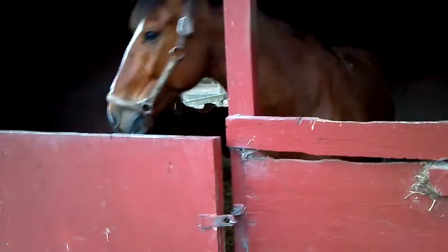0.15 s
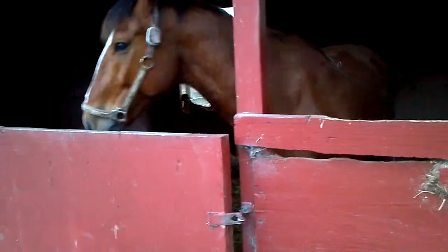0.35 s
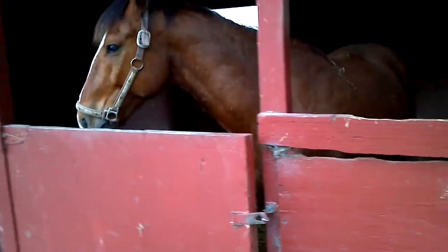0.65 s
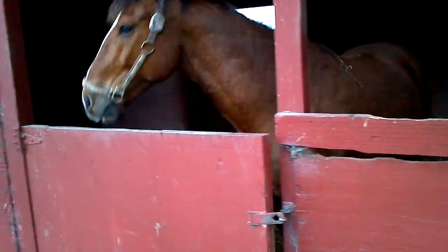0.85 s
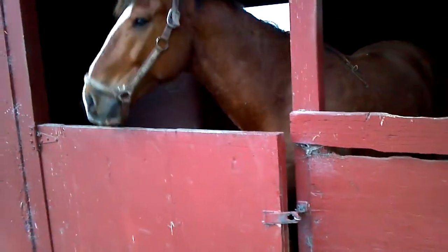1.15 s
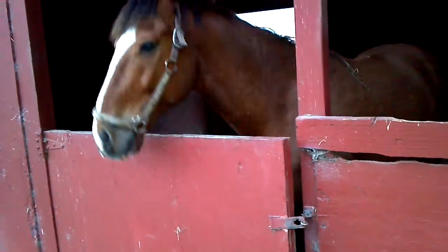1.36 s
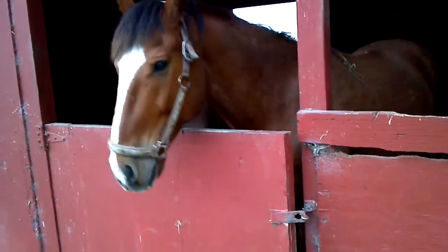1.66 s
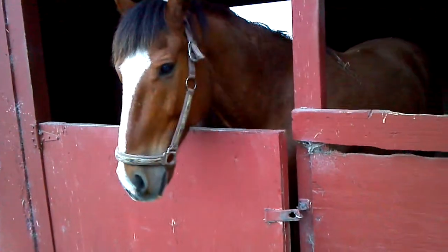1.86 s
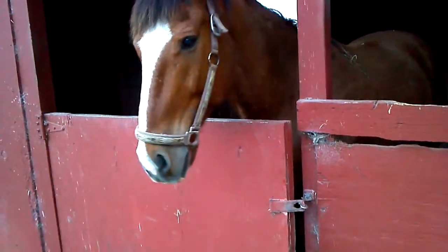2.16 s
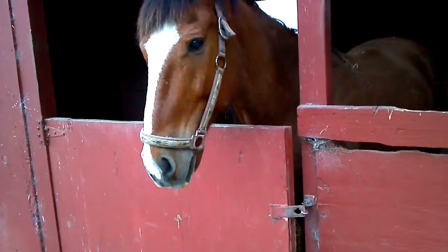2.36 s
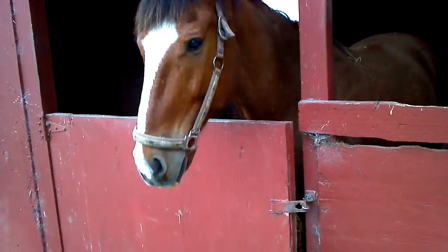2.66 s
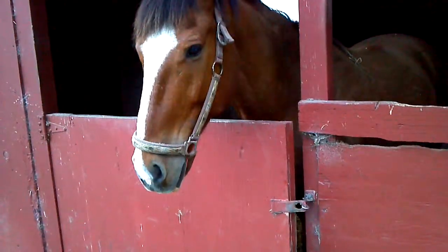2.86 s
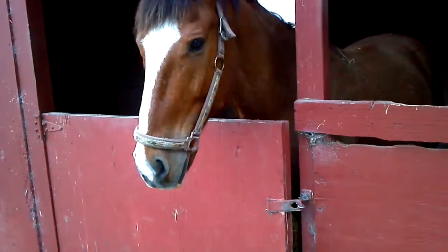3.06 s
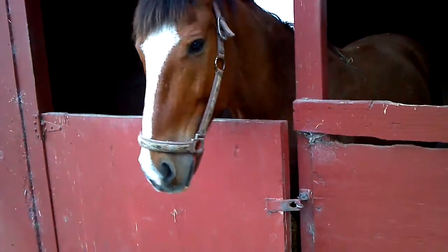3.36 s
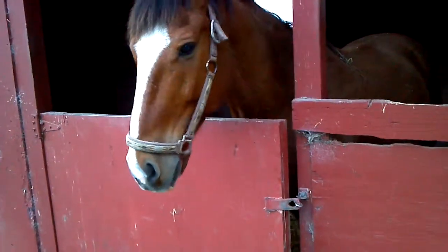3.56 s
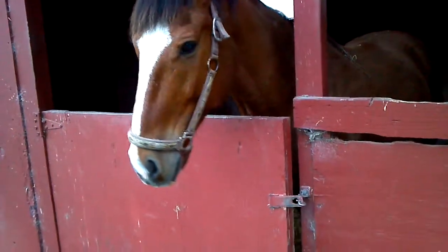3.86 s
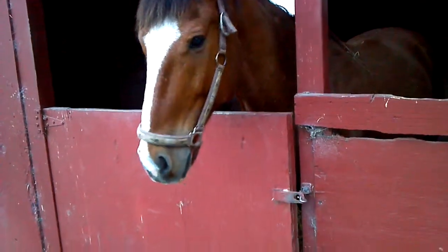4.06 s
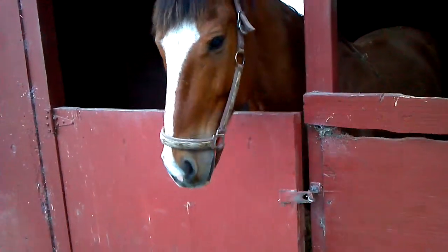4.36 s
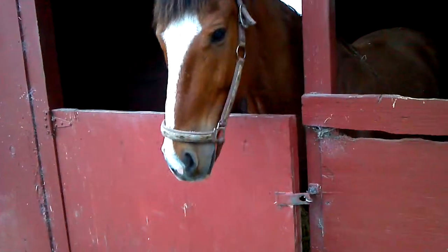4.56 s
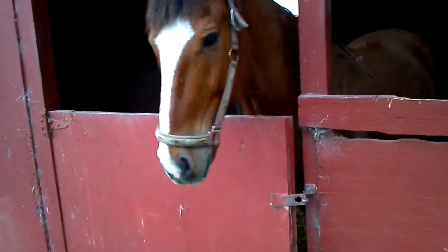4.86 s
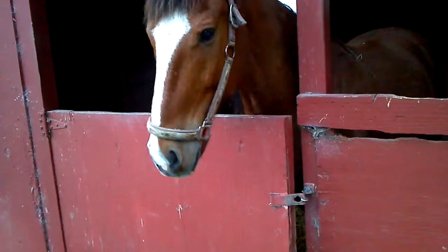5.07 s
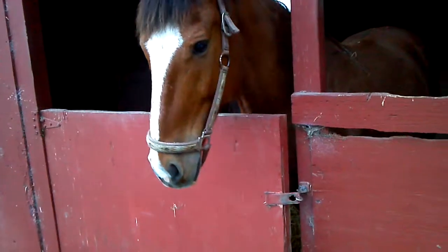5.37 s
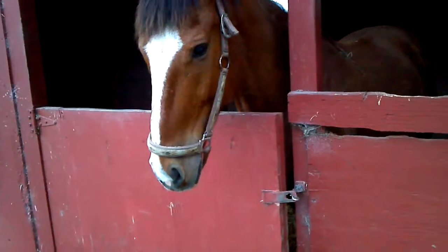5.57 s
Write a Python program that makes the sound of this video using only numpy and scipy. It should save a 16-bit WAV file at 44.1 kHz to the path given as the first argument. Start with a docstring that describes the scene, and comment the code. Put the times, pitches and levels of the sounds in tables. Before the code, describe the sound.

Faint birds chirp over a steady outdoor rush, then a horse bumps its wooden stall door and the metal latch rattles.

```python
"""Hoof against a stall door

A horse knocks a hoof against its plank stall door; the loose iron latch clacks and jingles.
A far steady roar fills the yard, a dry hiss swells, small birds call. Two microphone ports are
delayed and subtracted into left and right; gain control ducks after the blows."""
import sys
import numpy as np
from scipy import signal
from scipy.fft import rfft, irfft
from scipy.io import wavfile
from scipy.ndimage import uniform_filter1d

SR = 44100
rng = np.random.default_rng(int(sys.argv[2]) if len(sys.argv) > 2 else 0)


def unload_audio(sound):
    """Save the sound as a 16-bit wav file, at the path given as the first command line argument."""
    columns = np.transpose(np.atleast_2d(sound))
    # keep every value between -1 and 1, then stretch to whole-number steps
    steps = np.round(np.clip(columns, -1, 1) * 32767)
    wavfile.write(sys.argv[1], SR, steps.astype(np.int16))


N = 251811


def amp(db):
    return 10 ** (np.asarray(db) / 20)


def rms_one(x):
    return x / np.sqrt(np.mean(x ** 2) + 1e-20)


def at_hz(points, hz, column=1):
    return np.interp(np.log(hz), np.log(np.array(points)[:, 0]), np.array(points)[:, column])


def butter(x, order, hz, kind):
    return signal.sosfilt(signal.butter(order, hz, kind, fs=SR, output="sos"), x)


def nearness(hz, spot_hz, octaves):
    return np.exp(-(np.log2(hz / spot_hz) / octaves) ** 2)


def drift(rate_hz):
    """Smooth random wander with a spread of 1."""
    r = np.exp(-2 * np.pi * rate_hz * 40 / SR)   # one step every 40 samples
    slow = signal.lfilter([1], [1, -2 * r, r * r], rng.standard_normal(N // 40 + 2002))[2000:]
    return np.interp(np.arange(N) / 40, np.arange(len(slow)), rms_one(slow))


def ring(clicks, hz, t60):
    """A unit click sets a sine of height 1 ringing."""
    r, w = amp(-60 / (t60 * SR)), 2 * np.pi * hz / SR
    return signal.lfilter([0, np.sin(w)], [1, -2 * r * np.cos(w), r * r], clicks + 1e-18)


def resonance(x, hz, width_hz):
    r, w = np.exp(-np.pi * width_hz / SR), 2 * np.pi * hz / SR
    return signal.lfilter(np.array([1, 0, -1]) * (1 - r * r) / 2, [1, -2 * r * np.cos(w), r * r], x)


def spikes(times, db):
    out = np.zeros(N)
    np.add.at(out, np.round(np.asarray(times) * SR).astype(int), amp(db))
    return out


# Tone of the roar: freq_hz, relative_density_db
ROAR_SPECTRUM = [(30, 7), (80, -9), (180, -13), (242, -7), (388, -8.5), (600, -6), (904, -2), (1300, -9.5),
                 (1750, -12), (2500, -15.5), (4070, -24.5), (6900, -29.5), (12300, -29.5), (14000, -39),
                 (16000, -46)]
# How alike the roar is at the two ports: freq_hz, correlation
ROAR_LIKENESS = [(60, 0.78), (250, 0.95), (700, 0.71), (2000, 0.1)]

def far_roar(level_db=-47.5):
    """A steady bed of third-octave noise bands, partly alike at the two ports."""
    out, edges = 0, 28 * 2 ** np.arange(0, 9.4, 1 / 3)
    white = rng.standard_normal((2, 2, N))
    for k, (low, high) in enumerate(zip(edges, edges[1:])):
        common, own = butter(white[k % 2], 2, [low, high], "band")
        hz = np.sqrt(low * high)
        alike = at_hz(ROAR_LIKENESS, hz)
        second = alike * common + np.sqrt(1 - alike ** 2) * own
        out = out + amp(at_hz(ROAR_SPECTRUM, hz) + .26 * drift(4.6)) * np.array([common, second])
    return amp(level_db) * rms_one(out)


# Swells of hiss: centre_s, level_db
HISS_SWELLS = [(0, -53), (.55, -58), (.74, -51), (2.27, -60), (2.6, -61), (3.1, -60.5), (3.74, -44.5),
               (4.25, -61), (4.41, -57.5), (4.951, -41.5), (5.22, -54)]

def dry_hiss(half_width_s=.058):
    """Soft swells of fine dry hiss: faint rustling, and the latch's rattle after the blows."""
    t = np.arange(N) / SR
    swell = sum(amp(db) * np.exp(-((t - s) / half_width_s) ** 2 / 2) for s, db in HISS_SWELLS)
    return swell * rms_one(butter(rng.standard_normal(N), 2, [3900, 14500], "band"))


# One bird repeats a falling whistle: start_s, end_hz, level_db
BIRD_WHISTLES = [(-.08, 4410, -53.5), (0.085, 4390, -51.5), (0.253, 4380, -51.5), (0.424, 4360, -53),
                 (0.607, 4440, -53), (0.808, 4390, -53.5), (.97, 4450, -63)]
# Another answers with thin rising chips: start_s
CHIP_STARTS = [.03, .205, .365, .54]
# Shape of each chip: length_s, start_hz, end_hz, level_db
CHIP_SHAPE = (.045, 7200, 8350, -60)
# Single calls: start_s, length_s, start_hz, end_hz, level_db, buzz_rad
BIRD_CALLS = [(0.965, 0.04, 3830, 3170, -51, 0.1), (1.079, 0.29, 6150, 5930, -51.5, 0.6),
              (1.098, .022, 2320, 2280, -46, 0), (1.88, 0.15, 7100, 6900, -66, 0.13)]

def birds(whistle_s=.155, whistle_drop_hz=120, buzz_hz=274, echo_t60_s=.4):
    """Near sines that glide fast, then settle; far away they flutter and trail a soft echo."""
    out, t = np.zeros(N), np.arange(N) / SR
    flutter_db, wobble_hz = 3 * drift(60), 18 * drift(90)
    whistles = [(s, whistle_s, hz + whistle_drop_hz, hz, db, 0) for s, hz, db in BIRD_WHISTLES]
    chips = [(s, *CHIP_SHAPE, 0) for s in CHIP_STARTS]
    for s, length, start_hz, end_hz, db, buzz in whistles + chips + BIRD_CALLS:
        progress = (t - s) / length
        on = (progress > 0) & (progress < 1)
        hz = end_hz + (start_hz - end_hz) * (1 - progress[on]) ** 3 + wobble_hz[on] * (1 + 2 * buzz)
        envelope = np.sin(np.pi * progress[on] ** .5) ** .7 * amp(db + flutter_db[on])
        throat = 2 * np.pi * buzz_hz * t[on]   # its flutter swings loudness and pitch together
        tone = np.sin(2 * np.pi * np.cumsum(hz) / SR + buzz * np.sin(throat))
        out[on] += envelope * (1 + buzz * np.cos(throat)) * tone
    echo = amp(-36 - 60 * t[:SR // 3] / echo_t60_s) * rng.standard_normal(SR // 3)
    return out + signal.fftconvolve(out, echo)[:N]


# Latch hits, levels relative: start_s, clack_db, jingle_db, rise_ms, favoured_mode_hz
LATCH_HITS = [(1.0433, -44.5, -61, 2.2, 6900), (2.5666, -45, -52, 5.9, 6900),
              (3.6306, -15.5, -32, 1.15, 6900), (3.6378, -19, -25, 1.26, 6900),
              (3.659, -29, -41, 1.5, 6900), (3.691, -31, -40, 2.3, 6900), (3.698, -33.5, -49, 1.3, 6900),
              (3.7986, -35, -42.5, 7.9, 10300), (3.8403, -24.5, -30.5, 0.47, 14900),
              (4.19, -47.5, -59, 1.03, 3730), (4.4372, -14.5, -29, 2.1, 10300),
              (4.4451, -9, -12.5, 0.55, 12700), (4.448, -13, -39, 2.23, 3710), (4.5414, -25, -36, 1, 4000),
              (4.5475, -26.5, -35.5, 3.2, 11600), (4.59, -42, -48, 10.4, 10300),
              (4.627, -46, -41.5, 2.4, 14900), (4.7211, -41.5, -53, 1.15, 6900),
              (4.841, -25, -30, 3.3, 11600), (4.85, -16.5, -25, 4.5, 3665),
              (5.0132, -32.5, -39.5, 2.3, 10300), (5.021, -32.5, -50, 4.2, 3800),
              (5.0458, -17, -25, 1.47, 3930), (5.064, -25.5, -42, 1.03, 6900),
              (5.1442, -29, -40.5, 6, 9000), (5.1636, -26, -32.5, 2.3, 9600),
              (5.1745, -27, -38.5, 4.4, 12700), (5.545, -36.5, -36.5, 2.2, 11600),
              (5.6068, -39.5, -40, 4.8, 9030)]
# Hollow tone of the bolt in its keeper: centre_hz, width_hz, relative_db
CLACK_RESONANCES = [(984, 1380, 1), (1890, 1330, 5), (3450, 1360, 8.5), (5490, 6300, -2.5)]
# Ring of the latch, the bolt lowest: pitch_hz, relative_db, t60_s
IRON_MODES = [(3720, -9, 0.035), (6900, -12, 0.021), (9000, -5, 0.055), (9600, -28, 0.3), (10300, -18, .05),
              (11600, -6, 0.045), (12700, -16, 0.07), (14900, -7, 0.065)]

def latch_rattle():
    """Each hit is a short chatter of iron on iron: a hollow clack and a bright jingle."""
    clack, jingle = np.zeros((2, N))
    for s, clack_db, jingle_db, rise_ms, _ in LATCH_HITS:
        start = round(s * SR)
        t = np.arange(min(SR // 4, N - start)) / SR
        rise = 1000 * t / rise_ms
        shed_echo = amp(-19 - 60 * t / .17) * np.minimum(rise, 1)
        envelope = rise * np.exp(1 - rise) + shed_echo
        clack[start:start + len(t)] += amp(clack_db) * envelope
        jingle[start:start + len(t)] += amp(jingle_db) * envelope
    chatter = rng.standard_normal((2, N)) * amp(1.5 * drift(300))
    hollow = sum((-1) ** k * amp(db) * resonance(chatter[0], hz, width)
                 for k, (hz, width, db) in enumerate(CLACK_RESONANCES))
    bright = butter(chatter[1], 2, [8130, 14200], "band")
    return amp(-3.5) * clack * rms_one(hollow) + amp(4.5) * jingle * rms_one(bright)


def latch_ring(favour_db=12):
    """The same hits set the iron ringing; light, bright touches bring out the upper modes."""
    s, clack_db, jingle_db, rise_ms, spot_hz = np.transpose(LATCH_HITS)
    upper_db = -19 + .43 * jingle_db + .92 * (jingle_db - clack_db)
    chance_db = 3 * rng.standard_normal((len(s), len(IRON_MODES)))
    out = 0
    for k, (hz, db, t60) in enumerate(IRON_MODES):
        drive_db = upper_db if k else clack_db   # the bolt follows the clack
        spot_db = favour_db * nearness(hz, spot_hz, .07) + chance_db[:, k]
        out = out + ring(spikes(s + rise_ms / 1000, db + drive_db + spot_db), hz, t60)
    return out


# Hoof and door blows on the planks: start_s, peak_db, contact_ms, favoured_mode_hz
BLOWS = [(3.631, 2.5, 0.16, 359), (3.691, -10.5, 0.75, 700), (4.445, -22.5, 0.2, 330),
         (4.72, -12.5, 0.72, 238), (4.853, -23, 0.33, 506), (4.895, -8, 0.41, 290), (5.016, -11, 0.6, 630),
         (5.03, -14, 0.92, 323), (5.18, -25, 0.16, 770)]
# Woody body of the door: pitch_hz, relative_db, uncapped_t60_s
PLANK_MODES = [(120.7, -9, 0.41), (162.5, -2, 0.26), (235.7, 5.5, 0.16), (333, 3.5, 0.17), (345, -13, 0.24),
               (422, -13, 0.4), (491.7, -0.5, 0.4), (611.5, -6, 0.23), (677, -4, 0.39), (729, 4, 0.084),
               (772.5, -1.5, 0.18), (953, 4.5, 0.015), (1220, 1, 0.026), (1576, 1, 0.04), (1760, 5, 0.026),
               (916, 16.5, 0.009), (1870, 12.5, 0.024)]

def door_knocks(favour_db=7.6, max_t60_s=.22):
    """Each blow rings the nailed planks briefly; the spot struck colours the knock."""
    out = np.zeros(N)
    for s, peak_db, contact_ms, spot_hz in BLOWS:
        start = round(s * SR)
        click = spikes([0], 0)[:min(SR // 2, N - start)]
        body = sum(amp(db + favour_db * nearness(hz, spot_hz, .11)) * ring(click, hz, min(t60, max_t60_s))
                   for hz, db, t60 in PLANK_MODES)
        body = butter(body, 2, 400 / contact_ms, "low")   # longer contact, duller knock
        out[start:start + len(body)] += amp(peak_db) * body / np.max(np.abs(body))
    return out


# Tail of the shaking wall: freq_hz, relative_density_db, t60_s
WALL_DECAY = [(50.5, -39.5, 0.2), (110, -4.5, 0.73), (234, -2, 0.5), (510, -4.5, 0.36), (970, -10.5, 0.17),
              (2070, -19, 0.39), (3020, -21.5, 0.337)]

def wall_rumble():
    """The wall shakes on after each blow: noise that dies away band by band."""
    s, peak_db, _, _ = np.transpose(BLOWS)
    blow_power = spikes(s, 2 * (-3 + .86 * peak_db))   # doubling the dB squares the amplitude
    white = rng.standard_normal((2, 2, N))
    out, edges = np.zeros((2, N)), 50 * 2 ** np.arange(0, 6.1, .5)
    for k, (low, high) in enumerate(zip(edges, edges[1:])):
        hz = np.sqrt(low * high)
        decay = amp(-120 / (at_hz(WALL_DECAY, hz, column=2) * SR))
        power = signal.lfilter([1], [1, -decay], blow_power + 1e-18)
        power = signal.lfilter([.005], [1, -.995], power)   # the wall takes a few ms to build up
        common, own = butter(white[k % 2], 2, [low, high], "band")
        out += amp(at_hz(WALL_DECAY, hz)) * np.sqrt(power) * np.array([common, common + .23 * own])
    return out


def at_ports(pair, lead_s):
    """The second port hears the sound a little before the first."""
    size = N + 64
    advance = np.exp(2j * np.pi * np.fft.rfftfreq(size, 1 / SR) * lead_s)
    return np.array([pair[0], irfft(rfft(pair[1], size) * advance, size)[:N]])


def scene():
    """The yard and the stall as they reach the two ports."""
    far = at_ports(far_roar(), lead_s=.00033)
    stall = door_knocks() + wall_rumble() + latch_rattle() + latch_ring()
    return far + at_ports(stall, lead_s=.000079) + dry_hiss() + birds()


def gain_control(pair, threshold_db=-41, slope=.15, release_db_per_s=60):
    """Loud hits duck both channels, then the gain creeps back."""
    level_db = 10 * np.log10(uniform_filter1d(np.mean(pair ** 2, axis=0), size=441) + 1e-12)
    fall_db = release_db_per_s * np.arange(N) / SR
    held_db = np.maximum.accumulate(level_db + fall_db) - fall_db
    duck_db = signal.lfilter([.0005], [1, -.9995], -slope * np.maximum(held_db - threshold_db, 0))
    return pair * amp(duck_db)


def record(dry, lag_samples=16, cutoff_hz=16600):
    """Each port minus the delayed other gives left and right; then bass lift, ducking and a top cut."""
    first = butter(dry[0], 1, 36, "high")
    second = butter(amp(.7) * dry[1], 4, 2100, "low")   # a covered port passes no treble
    late = np.pad([second, first], ((0, 0), (lag_samples, 0)))[:, :N]
    pair = (np.array([first, second]) - late) * amp([[-1.2], [1.2]])
    zero, pole = np.exp(-2 * np.pi * np.array([700, 70]) / SR)
    pair = signal.lfilter([1, -zero], [1, -pole], pair) * amp(-2.5)   # lift the bass that subtraction thins
    pair = butter(pair, 4, 98, "high")   # wind cut
    pair = np.clip(gain_control(pair), -1, 1)
    return signal.sosfilt(signal.cheby2(12, 70, cutoff_hz, fs=SR, output="sos"), pair)


dry = scene()
out = record(dry)
unload_audio(out)
```